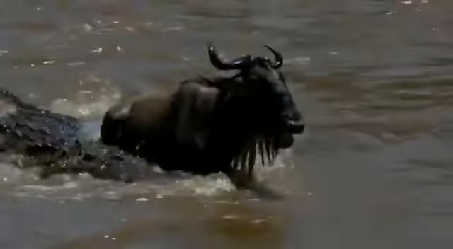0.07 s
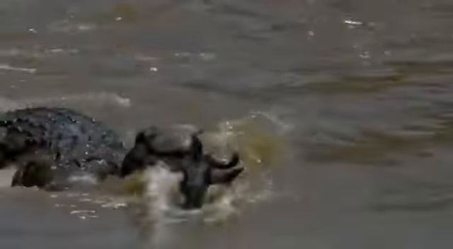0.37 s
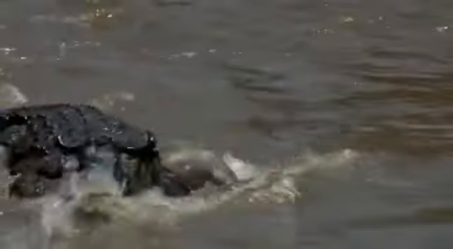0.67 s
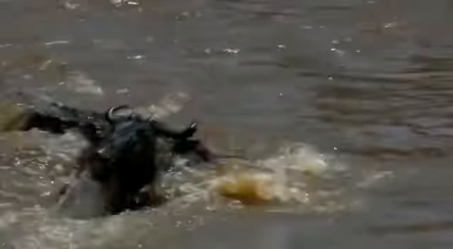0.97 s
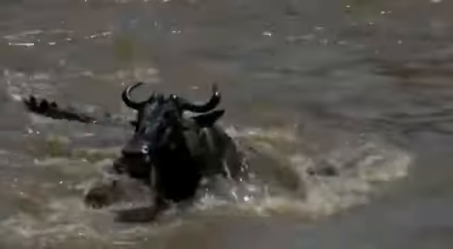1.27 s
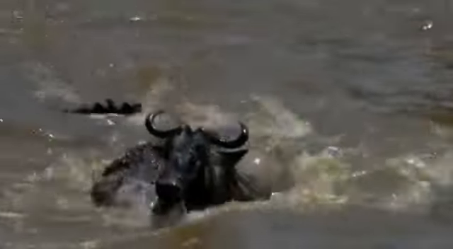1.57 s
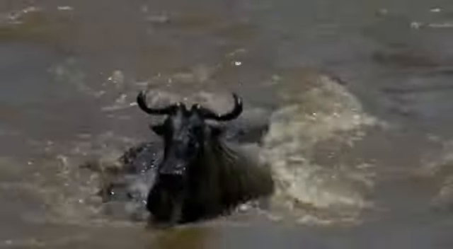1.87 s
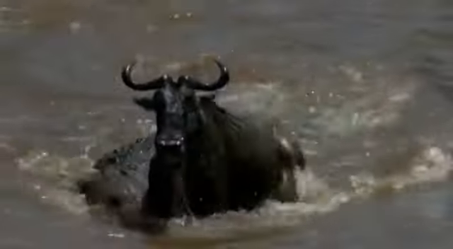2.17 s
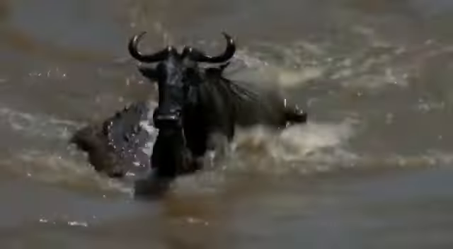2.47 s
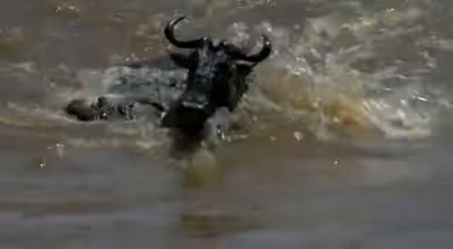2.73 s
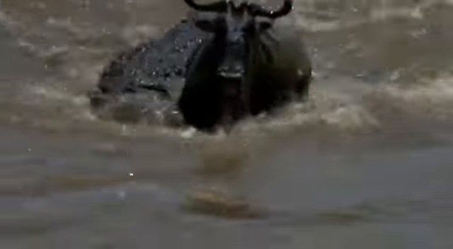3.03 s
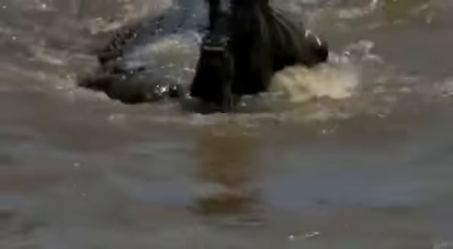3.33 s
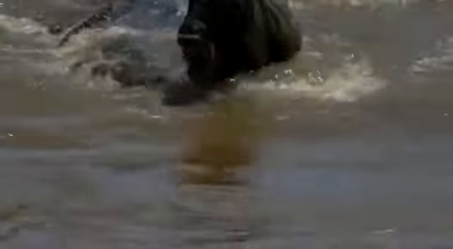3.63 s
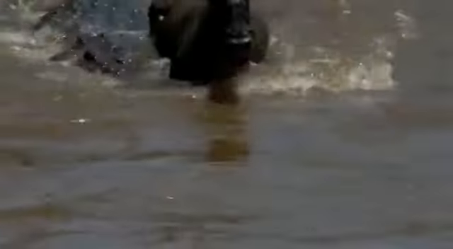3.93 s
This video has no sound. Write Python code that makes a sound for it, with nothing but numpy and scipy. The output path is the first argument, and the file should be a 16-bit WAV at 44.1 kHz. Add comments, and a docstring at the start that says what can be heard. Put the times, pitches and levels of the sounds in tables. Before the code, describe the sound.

A wildebeest's hooting bellow is already under way, peaking near 0.8 seconds and ending by 1. River water churns throughout, with splashes and hollow slaps from 0.6 to 2 seconds. Low grunts start at 1.8 seconds, break into a rasping growl at 2.3 and rise into another long, echoing bellow, loudest near 3.7. Spray and sharp drops fall around it, over a faint low rumble.

```python
"""Wildebeest in a river

A struggling wildebeest grunts, breaks into a rasping growl and rises to a long hooting bellow.
Its vocal folds pulse, and its chest, throat and mouth ring. The same call sounds twice, the first
already under way, each with a wide echo and a low rumble. Around it the water churns with bubbles,
splashes throw spray, slaps ring in pockets of air and sharp drops crack."""
import sys
import numpy as np
from scipy import signal
from scipy.fft import rfft, irfft
from scipy.io import wavfile

SR = 44100
rng = np.random.default_rng(int(sys.argv[2]) if len(sys.argv) > 2 else 0)


def inscribe(sig):
    """Save sig as 16-bit PCM at rate SR to the path in sys.argv[1].

    A 1-D sig is mono; a 2-D sig holds one channel per row.
    Samples are clipped to [-1, 1] before scaling.
    """
    pcm = np.round(np.clip(np.atleast_2d(sig).T, -1, 1) * 32767)
    wavfile.write(sys.argv[1], SR, pcm.astype(np.int16))


N = 176400
T = np.arange(N + SR // 2) / SR  # time in seconds, with half a second to spare
VOICE_WANDER_HZ, FADE_S = 60.21, 0.017


def amp(db):
    """Turns decibels into a number to multiply by."""
    return 10 ** (np.asarray(db) / 20)


def unit(x):
    """Scales a sound to an average (rms) level of 1."""
    return x / np.sqrt(np.mean(x ** 2) + 1e-20)


def curve(points):
    """Joins (time_s, value) points with straight lines."""
    return np.interp(T, *np.transpose(points))


def read(points, hz):
    """Looks up (frequency_hz, value) points, with octaves evenly spaced."""
    f, value = np.transpose(points)
    return np.interp(np.log(hz + 1), np.log(f), value)


def gate(t, start, end, rise=FADE_S, fall=FADE_S):
    """Fades in after start, holds at 1 and fades out before end."""
    return np.clip((t - start) / rise, 0, 1) * np.clip((end - t) / fall, 0, 1)


def bins(x):
    """The frequencies in a sound's spectrum."""
    return np.fft.rfftfreq(x.shape[-1], 1 / SR)


def colour(x, points):
    """Shapes the tone by (frequency_hz, level_db) points; the result has level 1."""
    return unit(irfft(rfft(x) * amp(read(points, bins(x))), x.shape[-1]))


def wander(size, hz=VOICE_WANDER_HZ):
    """A smooth random wobble, up to about hz times a second."""
    x = rng.standard_normal(size)
    return unit(irfft(rfft(x) / (1 + (bins(x) / hz) ** 4), size))


def resonate(x, hz, width_hz):
    """Makes a sound ring around one frequency by filtering it twice."""
    b, a = signal.iirpeak(hz, hz / width_hz, SR)
    return signal.lfilter(b, a, signal.lfilter(b, a, x))


def widen(pair, likeness):
    """Mixes two unrelated sounds into left and right: likeness 1 is the same, 0 is unrelated."""
    same = np.clip(read(likeness, bins(pair)), -1, 1)
    mid, side = rfft(pair) * np.sqrt([(1 + same) / 2, (1 - same) / 2])
    return irfft([mid + side, mid - side], pair.shape[-1])


def add(mix, start_s, sound):
    """Adds a sound to the mix at a given time."""
    part = mix[..., round(start_s * SR):][..., :sound.shape[-1]]
    part += sound[..., :part.shape[-1]]


def grains(per_s, spread_db):
    """Scattered clicks of uneven size, left and right."""
    shape = (2, len(T))
    sizes = amp(spread_db * np.minimum(rng.exponential(1, shape), 5))
    return sizes * rng.choice([-1, 1], shape) * (rng.random(shape) < per_s / SR)


def churn(cycles=7, glide=0.026, wash_db=-2):
    """Churning water: a crowd of bubbles, each ringing briefly with rising pitch, in a soft wash."""
    # tone of the water: frequency_hz, level_db
    tone = [(70, -34), (220, -3), (600, -1), (1050, -5.5), (1800, -1), (2500, -7.5), (3300, -22.5)]
    # loudness of the water: time_s, level_db
    loudness = [(0, -30), (.55, -35), (1.25, -36), (1.46, -39.5), (1.95, -37.5), (2.2, -32), (2.75, -39.5),
                (3.55, -30)]
    # how alike left and right are: frequency_hz, likeness (0-1)
    likeness = [(600, 0.7), (1700, 0.08)]
    bubbles = np.zeros((2, len(T)))
    for hz in np.geomspace(250, 3000, 30):
        age = np.arange(0, 4, hz / cycles / SR)  # counted in decay times
        ring = np.exp(-age) * np.sin(2 * np.pi * cycles * age * (1 + glide * age / 2))
        births = grains(per_s=260, spread_db=3.0)
        bubbles += np.sqrt(hz) * unit(signal.oaconvolve(births, ring[None], axes=1)[:, :len(T)])
    wash = amp(wash_db) * colour(rng.standard_normal(bubbles.shape), tone)
    water = unit(colour(bubbles, tone) + wash)
    return widen(water, likeness) * amp(curve(loudness))


def spray(hiss_db=-45.5, click_share=0.34):
    """Each splash throws up a cloud of fizzing droplets that rains down, over a faint steady hiss."""
    # tone of the spray: frequency_hz, level_db
    tone = [(300, -42.5), (2300, -1.5), (4700, 3), (6000, -1), (11500, -3.5), (15500, -15.5)]
    # splashes: start_s, level_db, rise_s, decay_s
    splashes = [(0, -33.5, 0.0039, 0.32), (0.713, -31, 0.0031, 0.22), (1.057, -38.5, .03, 0.53),
                (2.261, -37.5, .004, 0.2), (2.493, -38.5, .008, 0.18), (3.04, -35.5, 0.026, 0.42),
                (3.33, -36.5, 0.19, 4.2)]
    droplets = np.sqrt(click_share) * unit(grains(per_s=2500, spread_db=3.5))
    fizz = droplets + np.sqrt(1 - click_share) * rng.standard_normal((2, len(T)))
    power = amp(hiss_db) ** 2
    for start, db, rise, decay in splashes:
        cloud = np.clip((T - start) / rise, 0, 1) * np.exp(-np.maximum(T - start - rise, 0) / decay)
        power += (amp(db) * cloud) ** 2
    return colour(fizz, tone) * np.sqrt(power)


def drops(decay_s=0.0076):
    """Sharp drops crack: very short bursts of bright noise."""
    # drops: start_s, level_db
    hits = [(.716, -35), (2.261, -26.5), (2.493, -33), (2.540, -29), (3.108, -24), (3.28, -26.5)]
    tone = [(1500, -17), (8500, 4.5), (16000, -7.5)]  # frequency_hz, level_db
    out, t = np.zeros((2, len(T))), np.arange(SR) / SR
    for start, db in hits:
        crack = colour(rng.standard_normal((2, len(t))), tone)
        add(out, start, amp(db) * crack * np.exp(-t / decay_s))
    return out


def slaps(rise_s=0.0028):
    """Hollow slaps and sloshes ring briefly in a pocket of air."""
    # slaps of water: start_s, level_db, pitch_hz, decay_s
    hits = [(0.612, -35.5, 3000, 0.07), (.716, -32, 4750, .03), (.768, -26, 4860, .013),
            (.78, -36, 4730, 0.16), (.806, -21, 1990, 0.02), (.865, -34.5, 1990, .08),
            (1.13, -35.5, 1970, 0.19), (1.495, -36.5, 2170, 0.19), (1.917, -30.5, 2280, 0.023),
            (3.385, -34, 3470, 0.043)]
    out, t = np.zeros((2, len(T))), np.arange(SR) / SR
    for start, db, hz, decay in hits:
        ring = unit(resonate(rng.standard_normal((2, len(t))), hz, width_hz=490))
        add(out, start, amp(db) * ring * np.minimum(t / rise_s, 1) * np.exp(-t / decay))
    return out


def rumble(level_db=-44, start_s=1.81, end_s=4.2):
    """Deep noise under the call."""
    # tone of the rumble: frequency_hz, level_db
    tone = [(15, -10), (35, -3.5), (62, -6.5), (170, -23), (400, -80)]
    return amp(level_db) * colour(rng.standard_normal(len(T)), tone) * gate(T, start_s, end_s)


def echo(x):
    """A wide, blurred echo whose high notes die first."""
    # time the echo takes to fall by 60 dB: frequency_hz, fade_s
    fade_times = [(250, 1), (2000, 0.66)]
    # how alike left and right are: frequency_hz, likeness (0-1)
    likeness = [(640, 0.88), (1290, 0.19), (2400, 0)]
    hz, t, noise = signal.stft(rng.standard_normal((2, SR)), SR, nperseg=256)
    fade = amp(-60 * t / read(fade_times, hz)[:, None])
    tail = signal.istft(noise * fade, SR, nperseg=256)[1]
    tail = widen(tail / np.linalg.norm(tail[0]), likeness)
    return signal.fftconvolve(x[None], tail, axes=1)[:, :len(x)]


def vocal_folds(cycles, rough, puff_cycles=0.34):
    """Each cycle of the folds gives a pulse and a puff of rushing air; a rough voice has more puff."""
    pulses = sum(np.cos(2 * np.pi * k * cycles) for k in range(1, 24))
    puffs = np.exp(-(cycles % 1) / puff_cycles) * rng.standard_normal(len(cycles))
    return unit((1 - rough) * unit(pulses) + rough * unit(puffs))


def grunts(length_s=0.112, glide_hz_per_s=57.2, jitter=0.014):
    """Low pulses, slowly rising in pitch, ring the chest and the throat: one sound for each."""
    # grunts before the bellow: start_s, chest_db, throat_db, start_hz, roughness (0-1)
    events = [(1.813, -37.5, -45, 106.1, 0.52), (1.999, -30.5, -30.5, 123.8, 0.2),
              (2.092, -26, -26, 130.5, 0.1), (2.19, -34.5, -23, 136.1, 0.64)]
    # where the chest rings: pitch_hz, width_hz, level_db
    chest_rings = [(111, 45, -11.5), (255, 102, -4)]
    # where the throat rings: pitch_hz, width_hz, level_db
    throat_rings = [(850, 193, -2), (1283, 100, 0), (1702, 100, -4.5)]
    chest, throat = np.zeros((2, len(T)))
    t = np.arange(0, length_s, 1 / SR)
    fade = gate(t, 0, length_s, rise=0.016, fall=0.023)
    for start, chest_db, throat_db, start_hz, rough in events:
        pitch_hz = (start_hz + glide_hz_per_s * t) * (1 + jitter * wander(len(t)))
        buzz = vocal_folds(np.cumsum(pitch_hz) / SR, rough)
        for part, part_db, rings in (chest, chest_db, chest_rings), (throat, throat_db, throat_rings):
            ringing = sum(amp(db) * resonate(buzz, hz, width) for hz, width, db in rings)
            add(part, start, amp(part_db) * unit(ringing) * fade)
    return chest, throat


def rasp(pitch_hz, rough, jitter=0.09, mouth_width_hz=290, mouth_db=-11.5):
    """The growl: the folds rattle unevenly at half the pitch; the mouth rings more when it is rough."""
    # tone the throat gives the rattle: frequency_hz, level_db
    throat_tone = [(150, -34), (240, 8), (440, -0.5), (720, 0.5), (930, 5.5), (1040, -4.5), (1240, 2.5),
                   (1470, 3.5), (1620, -9), (2600, -27.5), (3300, -76)]
    # the mouth's ring, sinking as the growl starts: time_s, pitch_hz
    mouth_pitch = [(2.28, 860), (2.55, 660)]
    # rise and fall of the rasp: time_s, level_db
    loudness = [(2.27, -23.5), (2.6, -23.5), (3.3, -23), (3.55, -25), (3.68, -20.5), (3.8, -29)]
    rattle_hz = pitch_hz / 2 * (1 + jitter * wander(len(T)))
    rattle = vocal_folds(np.cumsum(rattle_hz) / SR, rough=0.6)
    # a moving filter: shift the mouth's pitch to 0 Hz, keep what is near it, shift back
    sweep = np.exp(2j * np.pi * np.cumsum(curve(mouth_pitch)) / SR)
    band = signal.lfilter(*signal.butter(2, mouth_width_hz / 2, fs=SR), rattle / sweep)
    mouth = unit((sweep * band).real)
    growl = rough * amp(mouth_db) * mouth + colour(rattle, throat_tone)
    return growl * amp(curve(loudness)) * gate(T, loudness[0][0], loudness[-1][0])


def overtones(cycles, flutter_db=3.3):
    """Single overtones bloom and fade as the mouth changes shape."""
    # blooms: peak_s, half_length_s, multiple of the pitch, level_db
    blooms = [(2.609, .04, 2, -23), (2.848, 0.12, 2, -25), (3.213, 0.087, 2, -27.5),
              (3.218, 0.22, 5, -34.5), (3.402, 0.1, 4, -30), (3.656, 0.1, 2, -28)]
    tones = sum(amp(db) * np.exp(-((T - peak) / half) ** 2) * np.sin(2 * np.pi * round(k) * cycles)
                for peak, half, k, db in blooms)
    return np.sqrt(2) * tones * amp(flutter_db * wander(len(T)))


def hoot(cycles, rough, shimmer=0.47, catch_s=0.014):
    """A pure tone that trembles when the voice is rough and dips briefly when it catches."""
    # rise and fall of the hoot: time_s, level_db
    loudness = [(2.29, -28.5), (2.37, -20), (2.44, -25.5), (2.54, -14.5), (2.745, -17), (2.79, -9.5),
                (2.96, -10), (3.2, -15.5), (3.47, -15.5), (3.6, -12), (3.665, -5.5), (3.73, -15.5),
                (3.88, -22.5)]
    # catches in the voice: time_s, depth_db
    catches = [(2.419, 10), (2.627, 12), (2.88, 4), (3.024, 5.5), (3.178, 17), (3.715, 8), (3.831, 9)]
    tone = np.sqrt(2) * np.sin(2 * np.pi * cycles) * (1 + shimmer * rough * wander(len(T)))
    dip_db = sum(depth * np.exp(-((T - time) / catch_s) ** 2) for time, depth in catches)
    return tone * amp(curve(loudness) - dip_db) * gate(T, loudness[0][0], loudness[-1][0])


def bellow(jitter=0.03):
    """One wavering pitch drives two sounds: the hoot with its overtones, and the growl."""
    # pitch of the bellow: time_s, pitch_hz
    melody = [(2.39, 218.3), (2.47, 242.4), (2.64, 252.5), (2.8, 265), (3.2, 276.6), (3.58, 279.4),
              (3.88, 265.8)]
    # how rough the voice is: time_s, roughness (0-1)
    roughness = [(2.38, 0.92), (2.52, 0.1), (3.6, .08), (3.85, 0.78)]
    rough = curve(roughness)
    pitch_hz = curve(melody) * (1 + jitter * rough * wander(len(T)))
    cycles = np.cumsum(pitch_hz) / SR
    tone, growl = hoot(cycles, rough), rasp(pitch_hz, rough)
    return tone + overtones(cycles), growl


def call(growl_db=-6, throat_db=-2, body_echo_db=-19.5, growl_echo_db=-1, throat_echo_db=-3):
    """Grunts and bellow, a little to the right, with their echo and the rumble."""
    chest, throat = grunts()
    tone, growl = bellow()
    body = tone + chest
    direct = body + amp(growl_db) * growl + amp(throat_db) * throat
    to_echo = amp(body_echo_db) * body + amp(growl_echo_db) * growl + amp(throat_echo_db) * throat
    balance = amp([[-0.5], [0.5]])  # left, right
    return direct * balance + echo(to_echo) + rumble()


def scene(earlier_s=2.854):
    """The same call twice over the water; the voice's times are those of the second call."""
    voice = call()
    mix = voice + churn() + spray() + drops() + slaps()
    add(mix, 0, voice[:, round(earlier_s * SR):])  # the first call, already under way
    return mix[:, :N]


def record(dry, cutoff_hz=15600):
    """Cuts off the very highest treble."""
    lowpass = signal.firwin(511, cutoff_hz, window=("kaiser", 9), fs=SR)
    return signal.oaconvolve(dry, lowpass[None], "same")


dry = scene()
out = record(dry)
inscribe(out)
```